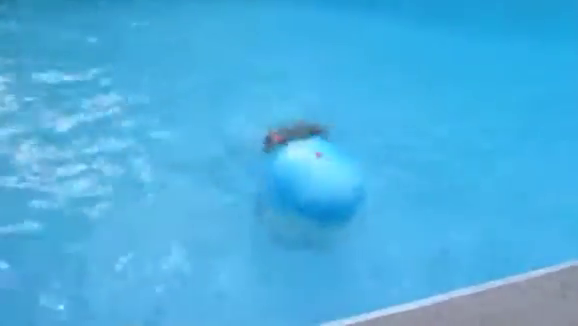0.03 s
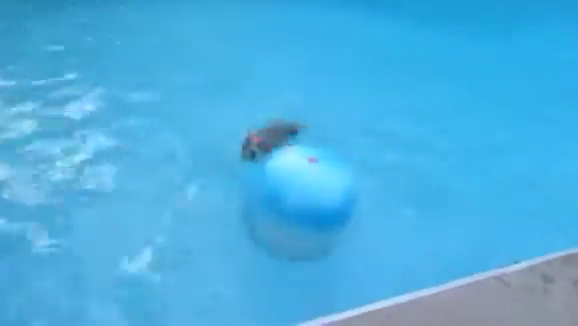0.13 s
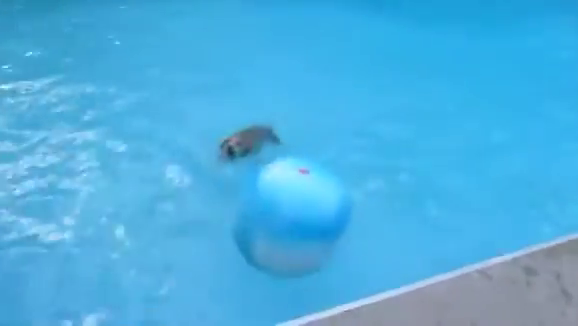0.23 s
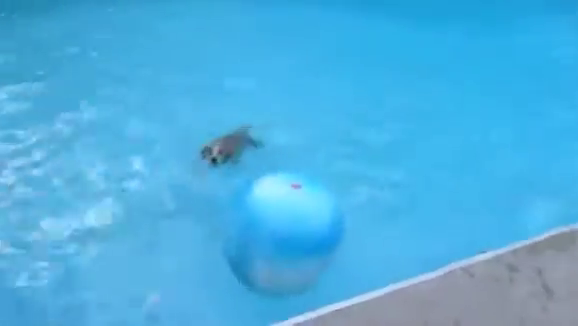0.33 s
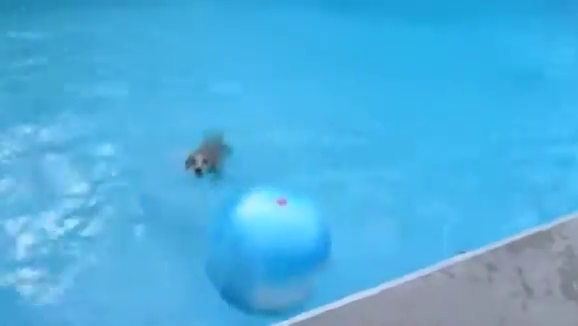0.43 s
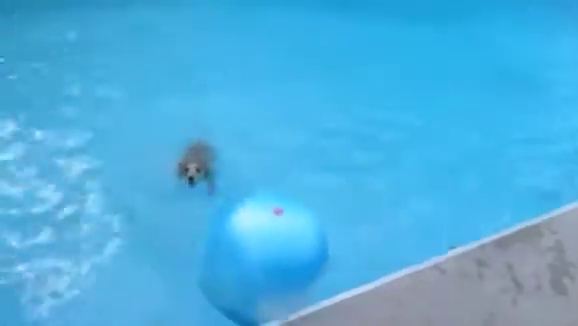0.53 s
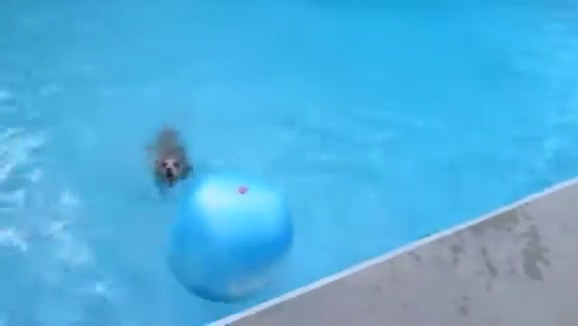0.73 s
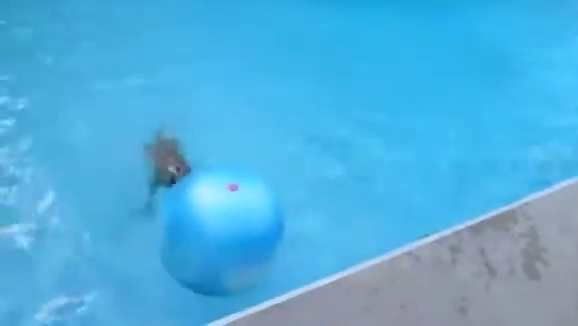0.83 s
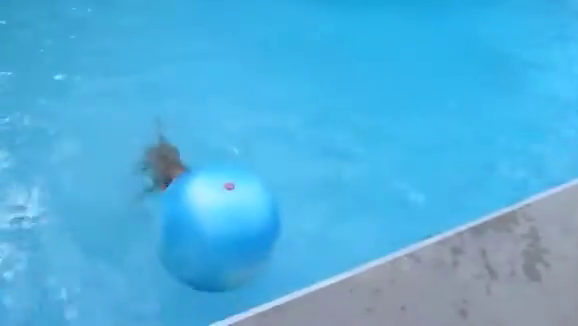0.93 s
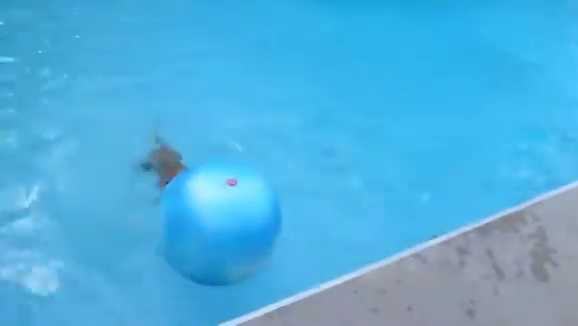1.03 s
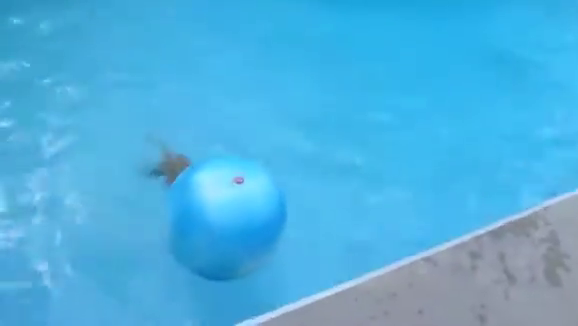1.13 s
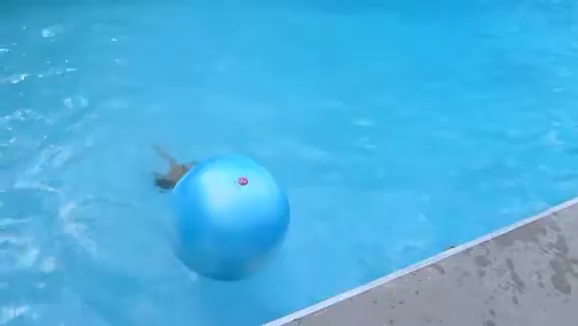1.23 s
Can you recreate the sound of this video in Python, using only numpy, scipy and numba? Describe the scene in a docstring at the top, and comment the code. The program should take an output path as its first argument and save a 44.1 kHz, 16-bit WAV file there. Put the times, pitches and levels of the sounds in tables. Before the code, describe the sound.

Two sharp, yelping barks come from a small dog swimming in an outdoor pool a few metres away. A light splash and drips open the scene, and quiet lapping continues as each bark echoes briefly around the yard.

```python
"""Small dog barking in a pool

A swimming dog barks twice, a few metres away. Each bark starts as a low, rough burst and arches
up into a yelp: vocal pulses and puffs of air ring through the moving throat and mouth.
The yard answers with an echo and a ringing tail. Water laps, sprays and drips underneath,
and the recorder's gain control ducks everything during each bark."""
import sys
import numpy as np
from scipy import signal
from scipy.fft import rfft, irfft
from scipy.io import wavfile
from scipy.ndimage import uniform_filter1d
from numba import njit

SR = 44100
rng = np.random.default_rng(int(sys.argv[2]) if len(sys.argv) > 2 else 0)


def persist_wave(psi):
    """Save psi, clipped to +-1, as 16-bit WAV."""
    counts = np.round(np.clip(psi, -1, 1) * 32767).astype(np.int16)
    wavfile.write(sys.argv[1], SR, np.atleast_2d(counts).T)


N = 57330


def amp(db):
    """Decibels to gain."""
    return 10 ** (np.asarray(db) / 20)


def unit_rms(x):
    """Scales to rms 1."""
    return x / np.sqrt(np.mean(x ** 2) + 1e-20)


def at_hz(points, hz, column=1):
    """One column of a table, interpolated over log frequency."""
    table = np.transpose(points)
    return np.interp(np.log(hz + 1), np.log(table[0] + 1), table[column])


def fader(points):
    """A gain curve through (time_s, level_db) points."""
    return amp(np.interp(np.arange(N) / SR, *np.transpose(points)))


def add(mix, start_s, sound):
    """Mixes a sound in at its start time."""
    part = mix[max(round(start_s * SR), 0):][:len(sound)]
    part += sound[:len(part)]


def resonate(x, hz, width_hz):
    """A steep resonance whose centre may move; at 0 Hz it is a low-pass."""
    carrier = np.exp(2j * np.pi * np.cumsum(hz * np.ones(len(x))) / SR)
    pole = np.exp(-np.pi * width_hz / SR)
    return 2 * (carrier * signal.lfilter([(1 - pole) ** 2], [1, -2 * pole, pole * pole], x / carrier)).real


# Stereo image of the wash and the yard's tail: freq_hz, left_right_correlation
STEREO_LIKENESS = [(25, .55), (60, 0.28), (130, 1), (1000, 0.92), (7000, 0.58)]

def stereo_pair(a, b, hz):
    """Blends two unrelated spectra into partly alike left and right channels."""
    likeness = np.clip(at_hz(STEREO_LIKENESS, hz), -1, 1)[:, None]
    return np.array([a, likeness * a + np.sqrt(1 - likeness ** 2) * b])


# Tone of the wash: freq_hz, relative_level_db
WASH_SPECTRUM = [(20, -38), (55, -24.5), (120, -7.5), (190, -8.5), (400, -8), (750, -4.5), (1400, -8),
                 (2200, -13), (4000, -21), (7000, -26)]
# The wash lifts, then settles: time_s, level_db
WASH_FADER = [(0, -37.5), (.16, -33.5), (.45, -38), (.75, -42), (1.3, -43)]

def wash(patch_db=2.5, swell_db=4.93):
    """Small waves: noise that flickers in patches of the spectrum and swells as a whole."""
    hz, t, noise = signal.stft(rng.standard_normal((2, N)), SR, nperseg=1024, noverlap=768)
    patches = uniform_filter1d(rng.standard_normal(noise.shape[1:]), size=9, axis=0)
    patches = unit_rms(uniform_filter1d(patches, size=6, axis=1))
    swell = unit_rms(uniform_filter1d(rng.standard_normal(len(t)), size=10))
    shape = amp(at_hz(WASH_SPECTRUM, hz)[:, None] + patch_db * patches + swell_db * swell)
    waves = signal.istft(stereo_pair(*noise, hz) * shape, nperseg=1024, noverlap=768)[1][:, :N]
    return unit_rms(waves) * fader(WASH_FADER)


def rumble(mid_db=-49.5, side_db=-56.5):
    """A low bed of noise; its deepest part is opposite in left and right."""
    mid = amp(mid_db) * unit_rms(resonate(rng.standard_normal(N), hz=112, width_hz=55))
    side = amp(side_db) * unit_rms(resonate(rng.standard_normal(N), hz=44.4, width_hz=55))
    return mid + np.array([side, -side])


# Laps against the pool's edge: start_s, length_s, pitch_hz, level_db
EDGE_SLOSHES = [(-.01, 0.059, 102.6, -46.5), (0.106, 0.092, 216, -42), (0.618, 0.026, 170, -43),
                (0.652, 0.049, 60, -46), (0.752, 0.059, 121.6, -51), (1.228, 0.09, 134, -50.5)]

def sloshes():
    """Each small wave swells and dies as a soft, low gulp."""
    t, out = np.arange(N) / SR, np.zeros(N)
    for start_s, length_s, pitch_hz, level_db in EDGE_SLOSHES:
        swell = np.sin(np.pi * np.clip((t - start_s) / length_s, 0, 1))
        gulp = swell * resonate(rng.standard_normal(N), pitch_hz, width_hz=90)
        out += amp(level_db) * unit_rms(gulp) * np.sqrt(length_s * SR / N)
    return out


# Splash of the paddling dog: time_s, level_db
SPRAY_FADER = [(0, -41), (.12, -47), (.22, -38.5), (.35, -47), (.7, -54), (1.3, -58)]

def spray(drops_per_s=9000, spread_db=3):
    """Fine drops patter back onto the water."""
    strength = amp(spread_db * np.minimum(rng.exponential(1, N), 4)) * rng.choice([-1, 1], N)
    impacts = strength * (rng.random(N) < drops_per_s / SR)
    return unit_rms(resonate(impacts, hz=3220, width_hz=6500)) * fader(SPRAY_FADER)


def bubble(pitch_hz, level_db, t60_s, attack_cycles=2.7, glide_per_s=2.3):
    """A trapped bubble rings and rises in pitch."""
    t = np.arange(0, t60_s, 1 / SR)
    envelope = amp(level_db - 60 * t / t60_s) * np.minimum(t * pitch_hz / attack_cycles, 1)
    return envelope * np.sin(2 * np.pi * pitch_hz * t * (1 + glide_per_s * t / 2))


# Drips that stand out: start_s, pitch_hz, level_db, t60_s
CLEAR_DRIPS = [(.040, 716, -24, 0.06), (0.072, 3730, -19.5, 0.0071), (0.094, 3170, -29, 0.017),
               (0.477, 4910, -29, 0.035), (0.606, 4340, -26, 0.0055), (.731, 4890, -38.5, 0.023)]

def drips(droplets=70):
    """A few clear drips among many faint droplets, each ringing a bubble."""
    out = np.zeros(N)
    for start_s, pitch_hz, level_db, t60_s in CLEAR_DRIPS:
        add(out, start_s, bubble(pitch_hz, level_db, t60_s))
    for when, pitch, strength in rng.random((droplets, 3)):
        droplet = bubble(pitch_hz=900 * 7 ** pitch, level_db=-46.5 + 10 * strength ** 2, t60_s=0.0066)
        add(out, when * N / SR, droplet)
    return out


# Reverb of the yard: freq_hz, level_db, t60_s
YARD_TAIL = [(250, -2, 0.25), (590, -20.5, 0.59), (840, -7.5, 0.45), (1300, -13.5, 0.78), (1480, -10.5, .9),
             (1880, -16, 0.59), (3000, -20.5, 0.55), (4500, -7, 0.42), (7480, -6.5, 0.15)]

def yard(dog, build_s=0.01, wall_s=0.15, wall_spread_s=0.015, wall_db=2.5):
    """Direct sound, one near reflection, and a diffuse tail that swells as the far wall answers."""
    near = dog.copy()
    add(near, start_s=0.0083, sound=amp(-23.5) * dog)  # off the pool's edge
    hz, t, noise = signal.stft(rng.standard_normal((2, N)), SR, nperseg=256)
    t60_s = at_hz(YARD_TAIL, hz, column=2)[:, None]
    echo_db = wall_db * np.exp(-((t - wall_s) / wall_spread_s) ** 2)
    decay = amp(at_hz(YARD_TAIL, hz)[:, None] + echo_db - 60 * t / t60_s)
    decay *= np.sqrt(2 * np.log(1000) / (t60_s * SR))  # longer tails spread their energy thinner
    tail = signal.istft(stereo_pair(*noise, hz) * decay * np.minimum(t / build_s, 1), nperseg=256)[1]
    return near + signal.fftconvolve(dog[None], tail, axes=1)[:, :N]


def cut_below_pitch(x, cycles, pitch_ratio=0.82, steps=128):
    """A high-pass that tracks the pitch by filtering on a grid of equal steps per cycle."""
    grid = np.arange(0, cycles[-1], 1 / steps)
    high_pass = signal.butter(10, pitch_ratio, "high", fs=steps, output="sos")
    return np.interp(cycles, grid, signal.sosfilt(high_pass, np.interp(grid, cycles, x)))


def vocal_folds(pitch_hz, roughness, pulsing, jitter=0.13, shimmer=0.3, puff_cycles=0.58):
    """The folds chop the breath into pulses; roughness shakes the pitch and trades tone for air puffs."""
    wobble, air, shake = rng.standard_normal((3, N))[:, :len(pitch_hz)]
    wobble = unit_rms(resonate(wobble, 0, width_hz=734))
    cycles = np.cumsum(pitch_hz * np.exp(jitter * roughness * wobble)) / SR
    pulses = sum(np.cos(2 * np.pi * k * cycles) for k in range(1, 24))
    pulses *= 1 + pulsing * np.cos(np.pi * cycles)  # strong and weak pulses alternate
    pulses *= 1 + shimmer * unit_rms(resonate(shake, 0, width_hz=1000))  # no two are equally strong
    puffs = (0.051 + np.exp(-(cycles % 1) / puff_cycles)) * air
    return cut_below_pitch((1 - roughness) * unit_rms(pulses) + roughness * unit_rms(puffs), cycles)


# Formants that stay put: freq_hz, width_hz, gain_db
HEAD_FORMANTS = [(260, 104, -5), (670, 143, -2.5), (1656, 200, -6.5), (4460, 2500, -39.5)]
# Formants that sound as the mouth opens: freq_hz, width_hz, gain_db
MUZZLE_FORMANTS = [(2028, 330, -3.5), (3192, 130, -7)]

def vocal_tract(source, throat_hz, mouth_hz, mouth_db, rasp_db):
    """Throat, mouth and head colour the voice; a high rasp resonance moves with the mouth."""
    throat = resonate(source, throat_hz, width_hz=332)
    mouth = resonate(source, mouth_hz, width_hz=690)
    rasp = resonate(source, 2.262 * mouth_hz, width_hz=705)
    muzzle = sum(amp(db) * resonate(source, hz, width) for hz, width, db in MUZZLE_FORMANTS)
    head = sum(amp(db) * resonate(source, hz, width) for hz, width, db in HEAD_FORMANTS)
    return throat + amp(mouth_db) * (mouth + muzzle) + amp(rasp_db) * rasp + head


# Gesture of each bark, one list of breakpoints apiece:
# time_s, pitch_hz, level_db, roughness (0-1), pulsing (0-1), throat_hz, mouth_hz, mouth_db, rasp_db
BARK_GESTURES = [
    [(.180, 189, -47, 0.52, 0.26, 800, 1860, -20, -32.5),
     (.207, 281.6, -19, 0.54, 0.55, 920, 2103, -22, -27.5),
     (.223, 445.1, -4, 0.41, 0, 940, 1980, -13, -31.5), (.245, 501.4, 3, 0.46, 0.1, 1020, 1990, -4, -52),
     (.262, 599.4, 2, 0.12, 0.44, 1130, 2540, -0.5, -27),
     (.298, 659.6, -1.5, 0.26, 0.47, 1566, 3030, -1.5, -28),
     (.326, 644.8, -5.5, .3, 1, 1550, 2685, -1, -13), (.347, 545.3, -5, 0.36, 0.9, 926, 2566, -1, -30.5),
     (.366, 488, -17, 0.9, 0.9, 800, 2266, -13.5, -6.5)],
    [(.819, 335.8, -37.5, 0.55, 0.2, 900, 2745, -19, -27.5),
     (.827, 390, -23.5, .6, 0.01, 1000, 2850, -13.5, -38),
     (.833, 393.8, -8, 0.44, 0.58, 1213, 3050, -10.5, -28), (.855, 543.3, -4, .42, 0.9, 1130, 2734, 1, -19),
     (.884, 615.3, -2.5, 0.42, 0.33, 1200, 2830, -3.5, -17),
     (.902, 653, 0.5, 0.07, 0.16, 1290, 2500, -5.5, -17.5),
     (.918, 675.4, -3.5, 0.27, 0.76, 1300, 2454, 6.5, -20),
     (.940, 545.8, -6, 0.36, 0.9, 1310, 2790, -12.5, -26.5),
     (.964, 493.6, -20, 0.87, .2, 1150, 2730, -18.5, -26)],
]

def bark(gesture, fade_s=0.001, window=400):
    """The folds drive the tract from gruff onset to yelp; returns the start time and the sound."""
    times, *columns = np.transpose(gesture)
    t = np.arange(times[0], times[-1], 1 / SR)
    pitch_hz, level_db, roughness, pulsing, *tract = (np.interp(t, times, c) for c in columns)
    voice = vocal_tract(vocal_folds(pitch_hz, roughness, pulsing), *tract)
    power = abs(uniform_filter1d(uniform_filter1d(voice ** 2, window), window))
    voice /= np.sqrt(power + 1e-12)  # flattened so that the gesture sets the loudness
    fade = np.minimum(np.minimum(t - t[0], t[-1] - t) / fade_s, 1)
    return times[0], voice * amp(level_db) * fade


def scene():
    """The dog in the yard, over the water."""
    dog = np.zeros(N)
    for gesture in BARK_GESTURES:
        add(dog, *bark(gesture))
    return yard(dog) + wash() + rumble() + sloshes() + spray() + drips()


@njit
def follow(target, attack_s, release_s):
    """Follows a curve upward and downward at different speeds."""
    out = np.zeros(len(target))
    for i in range(1, len(target)):
        gap = target[i] - out[i - 1]
        out[i] = out[i - 1] + gap / (SR * (attack_s if gap > 0 else release_s))
    return out


def gain_control(x, threshold_db=-23.5, slope=0.67):
    """Ducks both channels when the level passes the threshold, clamping down on each bark."""
    power_db = 10 * np.log10(abs(uniform_filter1d((x ** 2).mean(0), size=300)) + 1e-12)
    duck_db = follow(slope * np.maximum(power_db - threshold_db, 0), attack_s=0.017, release_s=0.068)
    return x * amp(-duck_db)


# Colour difference between the microphone ports: freq_hz, left_minus_right_db
PORT_BALANCE = [(60, 1.5), (120, 0.0), (240, -0.5), (480, -0.5), (960, -0.5), (1930, -2), (3860, 1),
                (7730, 2.5)]
# Phase difference between the ports: freq_hz, left_lead_rad
PORT_LEAD = [(0, -0.64), (150, -0.58), (550, -0.42), (1100, -.5), (2150, -0.68), (2840, -0.27),
             (5000, -0.81), (7500, -0.017)]

def record(dry, cutoff_hz=7200):
    """Two microphone ports, unlike in colour and phase, feed the gain control and a steep low-pass."""
    hz = np.fft.rfftfreq(2 * N, 1 / SR)
    port = amp(at_hz(PORT_BALANCE, hz) / 2) * np.exp(1j * at_hz(PORT_LEAD, hz) / 2)
    heard = irfft(rfft(dry, 2 * N) * np.array([port, 1 / port]))[:, :N]
    low_pass = signal.firwin(301, cutoff_hz, window=("kaiser", 8), fs=SR)
    return signal.oaconvolve(gain_control(heard), low_pass[None], "same")


dry = scene()
out = record(dry)
persist_wave(out)
```